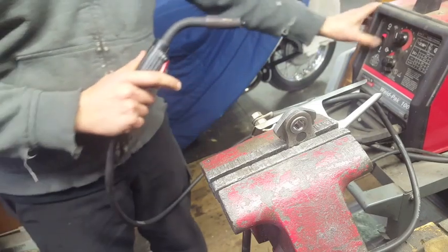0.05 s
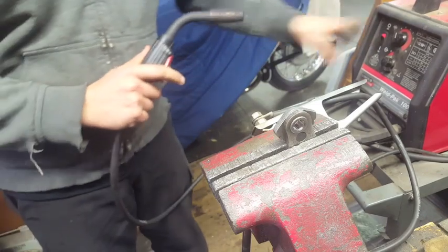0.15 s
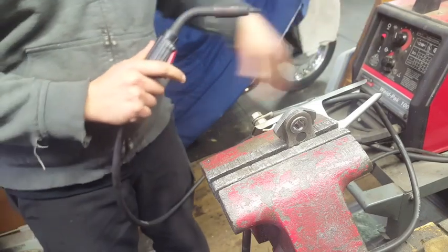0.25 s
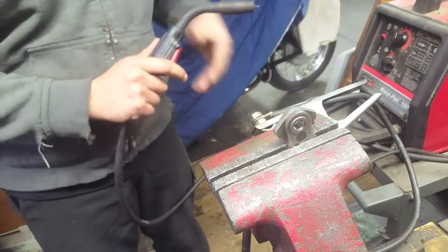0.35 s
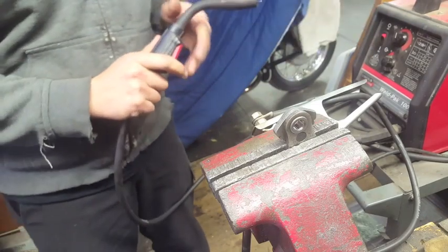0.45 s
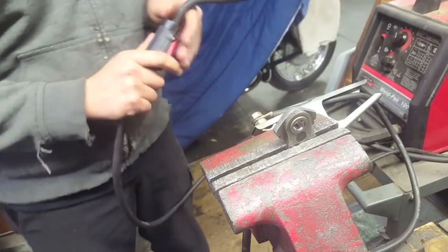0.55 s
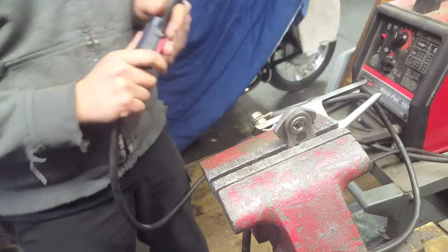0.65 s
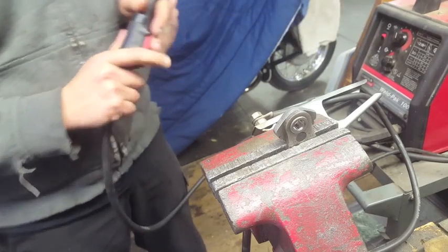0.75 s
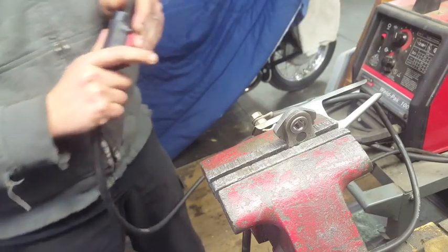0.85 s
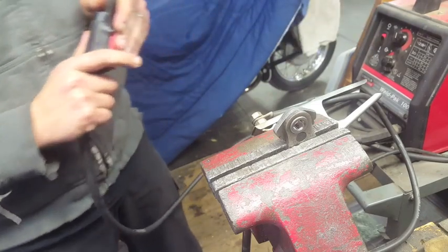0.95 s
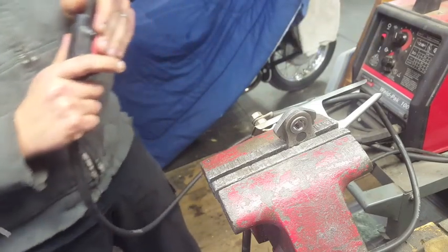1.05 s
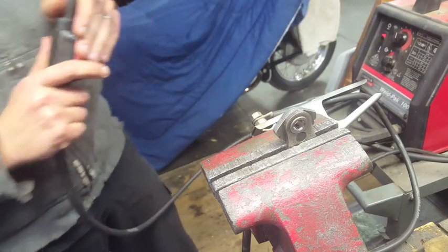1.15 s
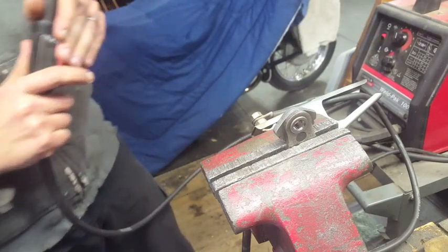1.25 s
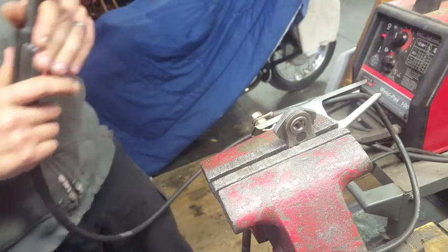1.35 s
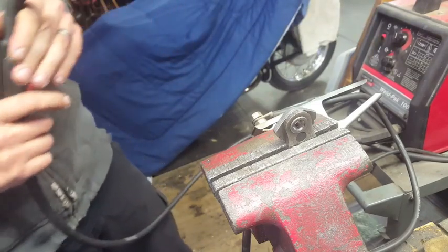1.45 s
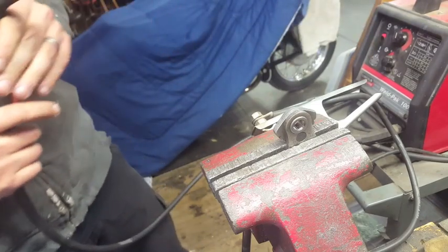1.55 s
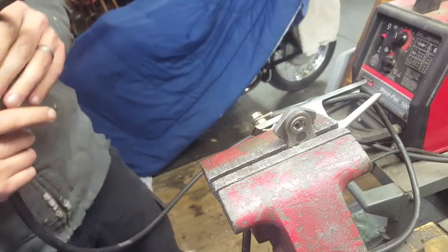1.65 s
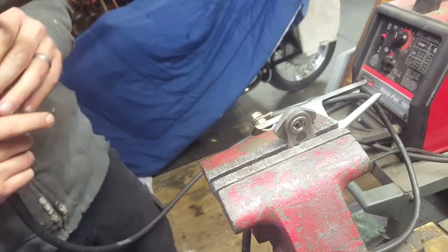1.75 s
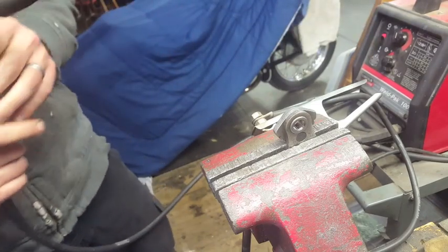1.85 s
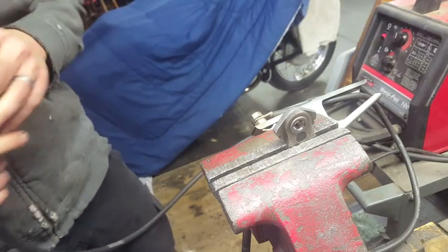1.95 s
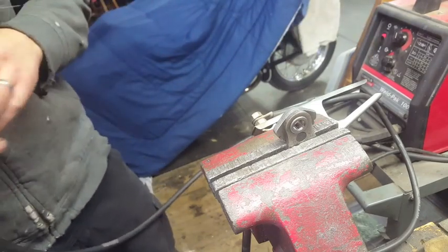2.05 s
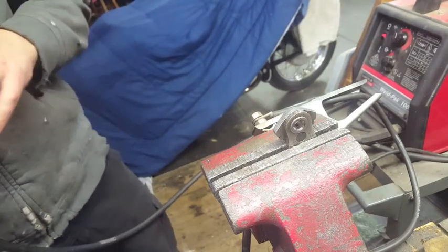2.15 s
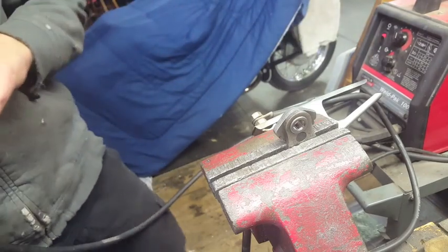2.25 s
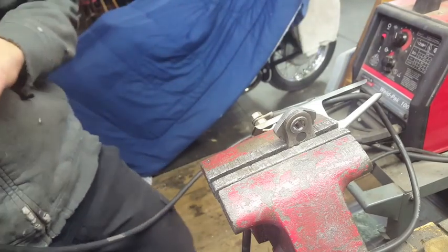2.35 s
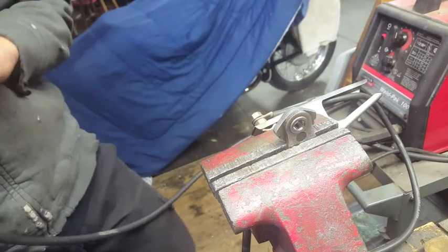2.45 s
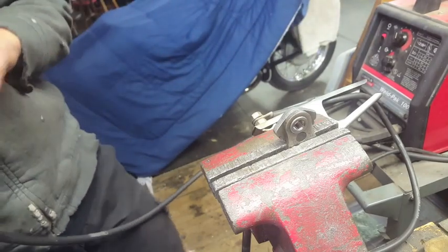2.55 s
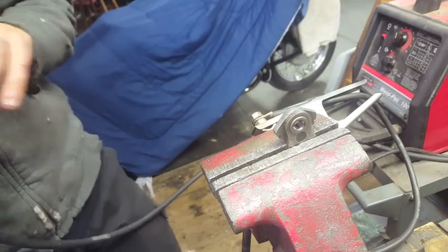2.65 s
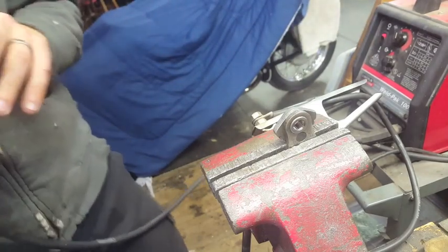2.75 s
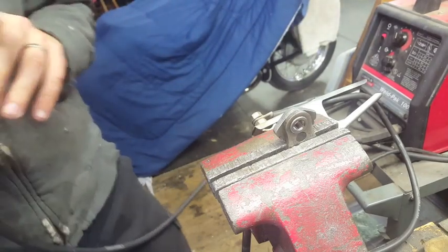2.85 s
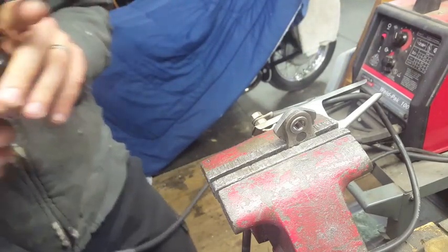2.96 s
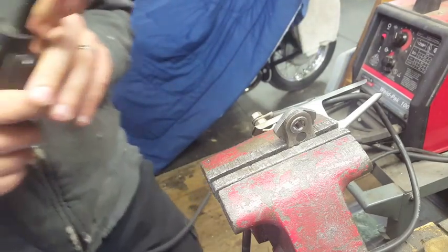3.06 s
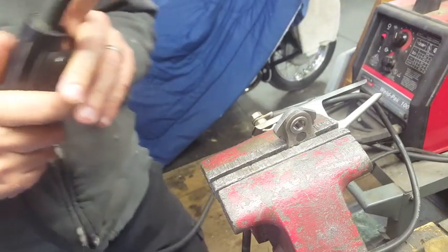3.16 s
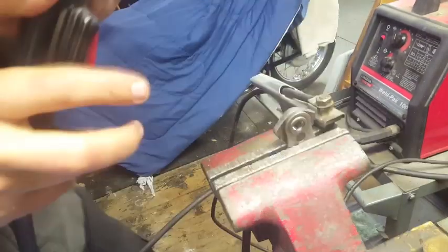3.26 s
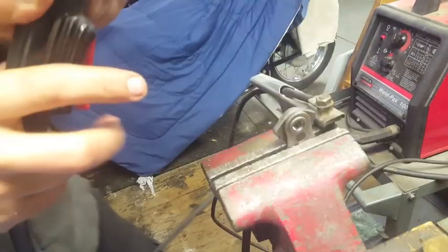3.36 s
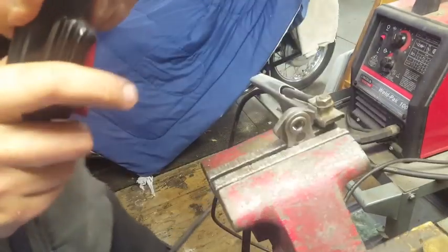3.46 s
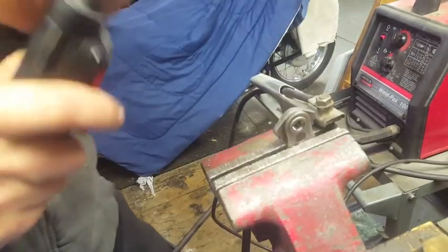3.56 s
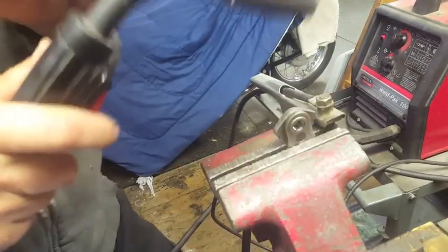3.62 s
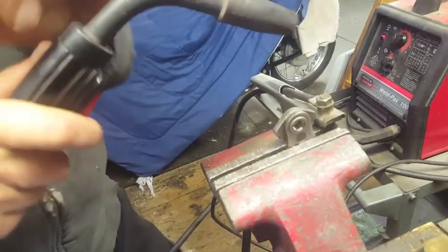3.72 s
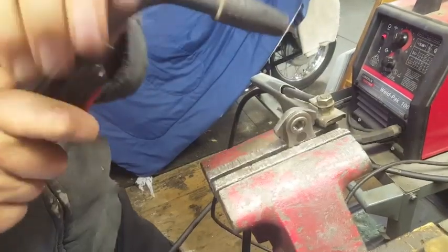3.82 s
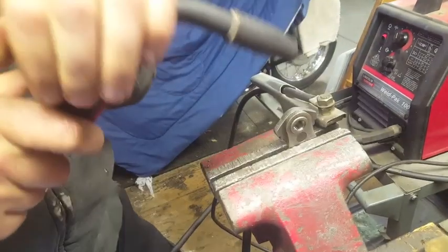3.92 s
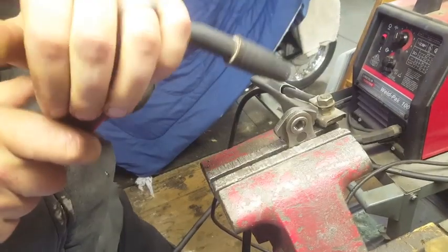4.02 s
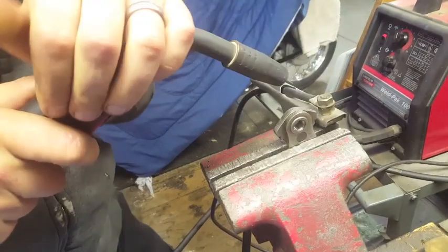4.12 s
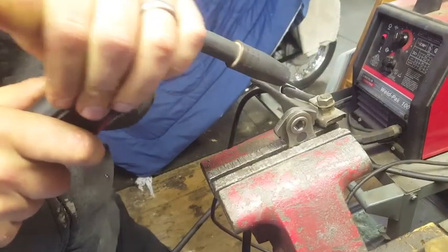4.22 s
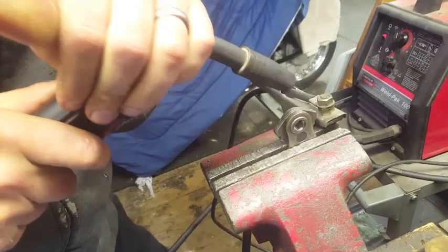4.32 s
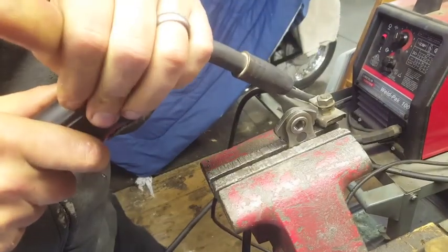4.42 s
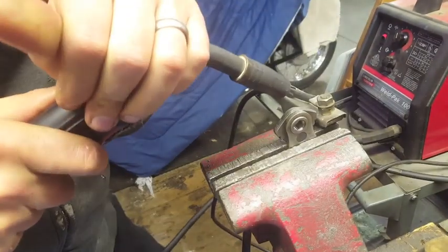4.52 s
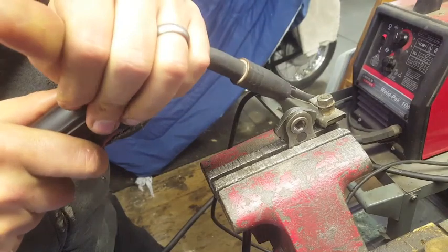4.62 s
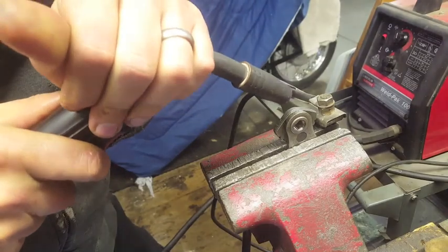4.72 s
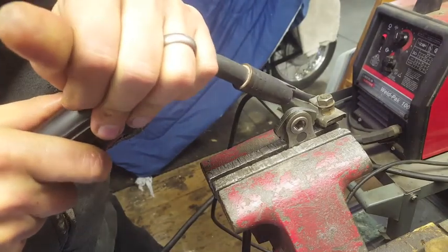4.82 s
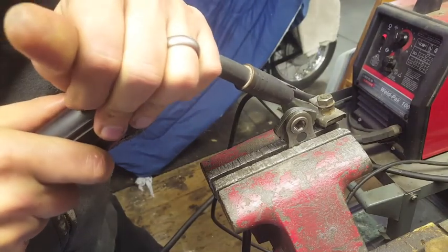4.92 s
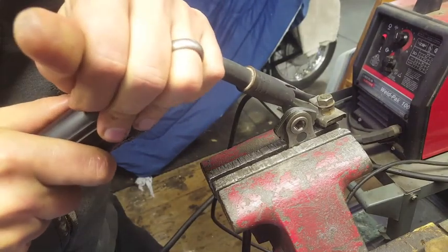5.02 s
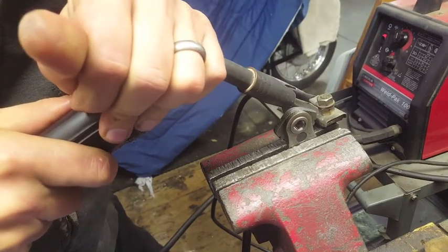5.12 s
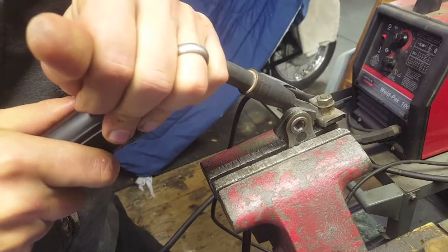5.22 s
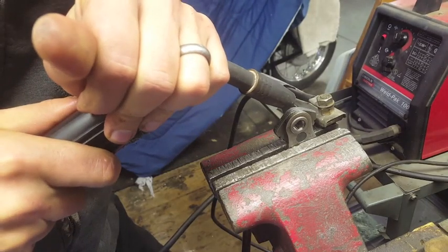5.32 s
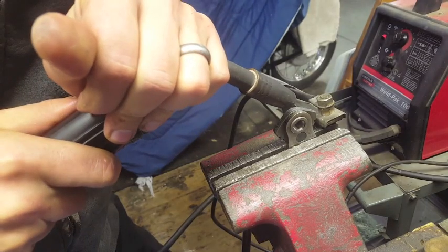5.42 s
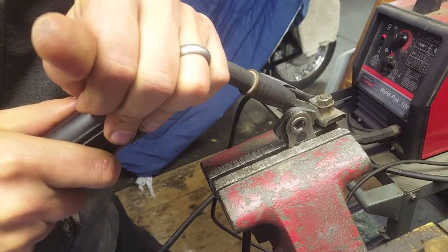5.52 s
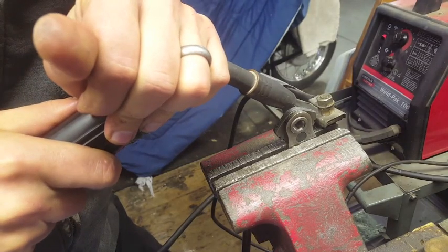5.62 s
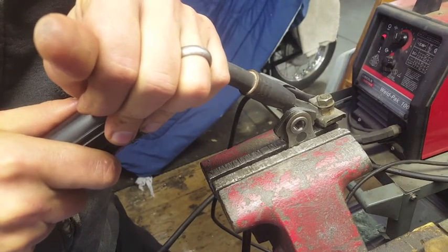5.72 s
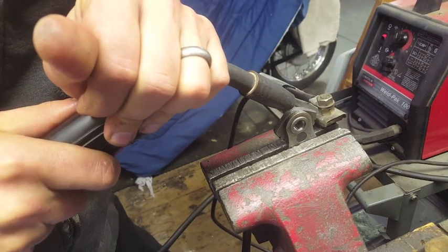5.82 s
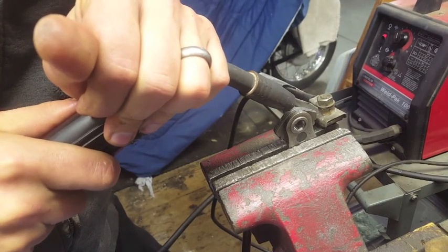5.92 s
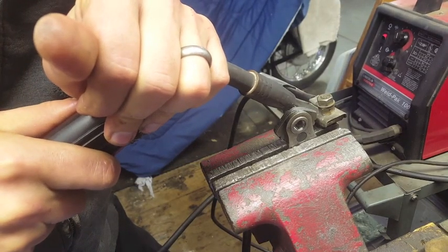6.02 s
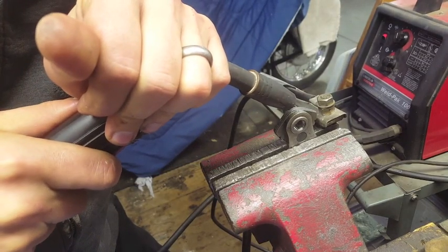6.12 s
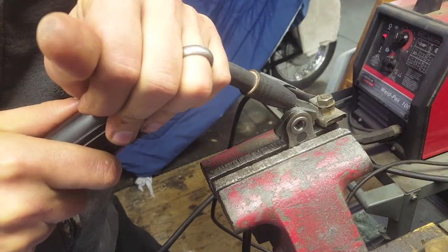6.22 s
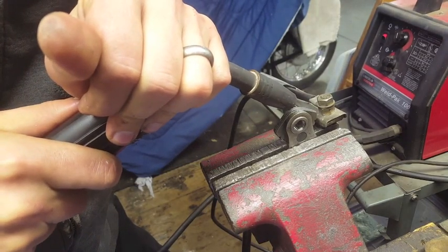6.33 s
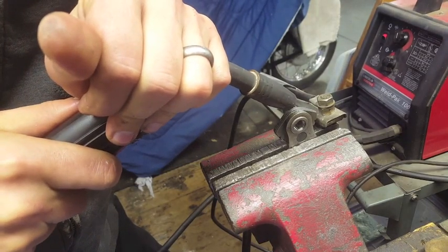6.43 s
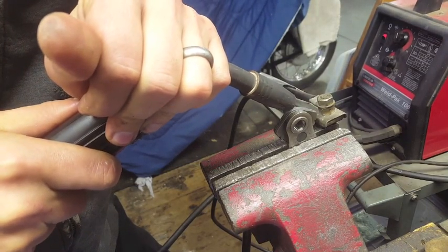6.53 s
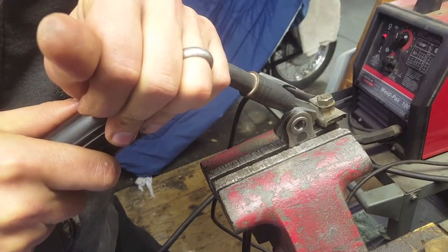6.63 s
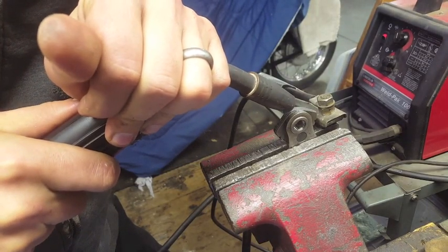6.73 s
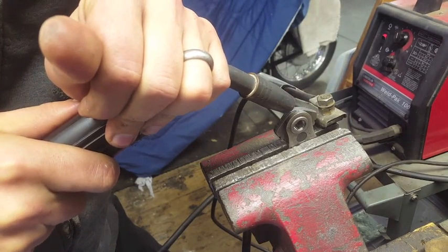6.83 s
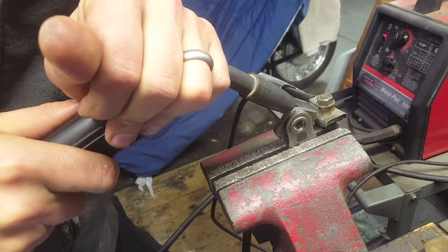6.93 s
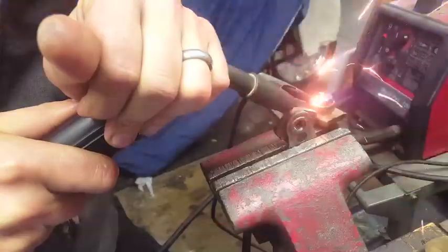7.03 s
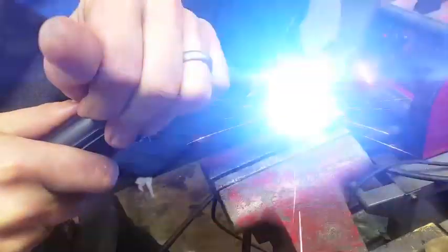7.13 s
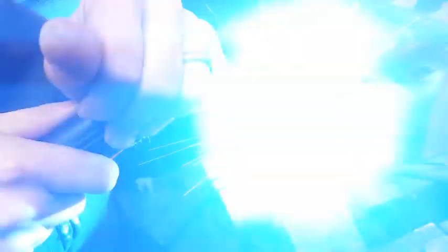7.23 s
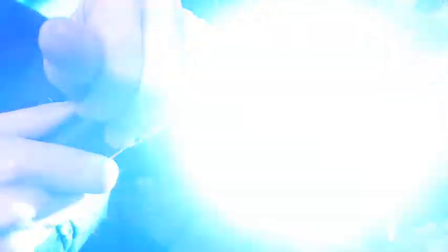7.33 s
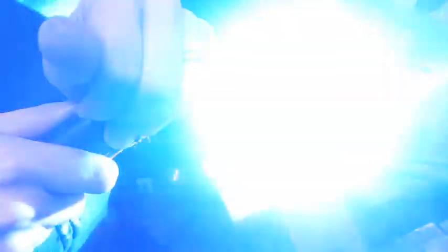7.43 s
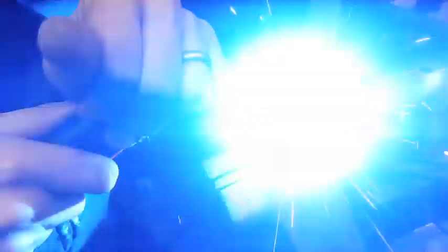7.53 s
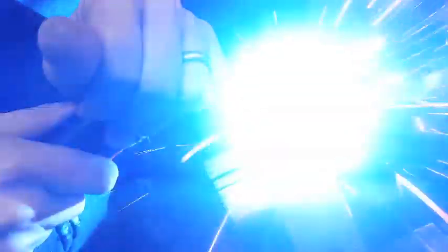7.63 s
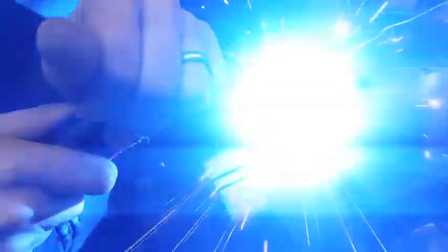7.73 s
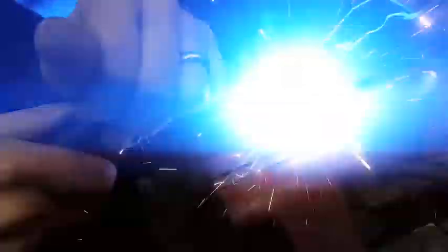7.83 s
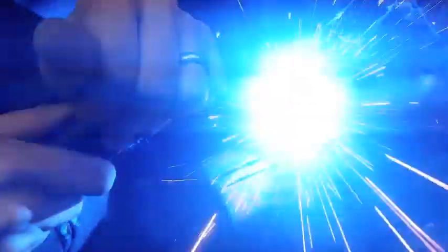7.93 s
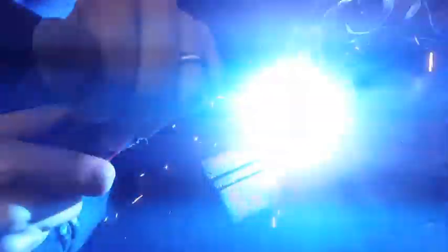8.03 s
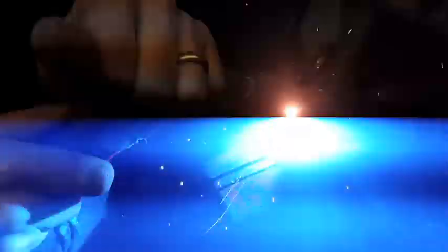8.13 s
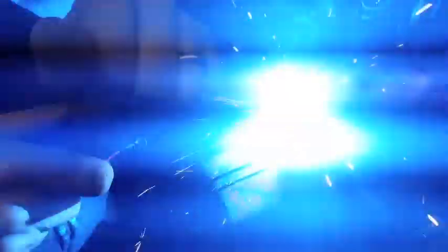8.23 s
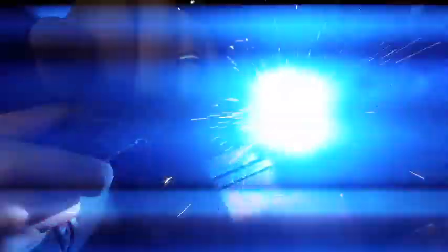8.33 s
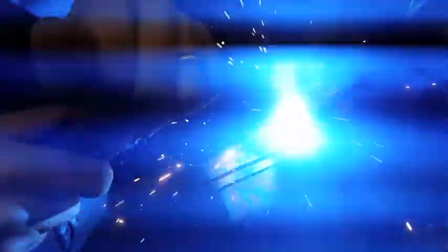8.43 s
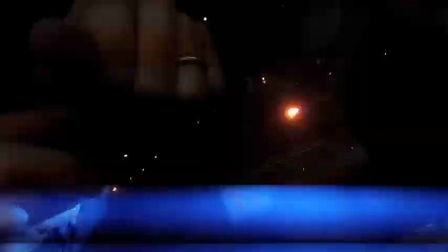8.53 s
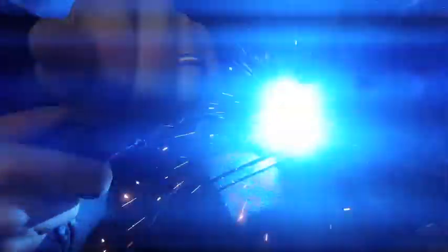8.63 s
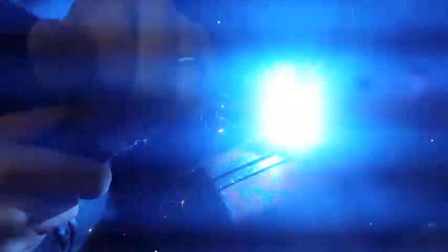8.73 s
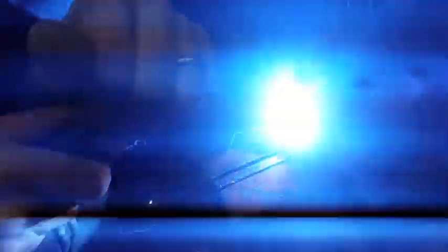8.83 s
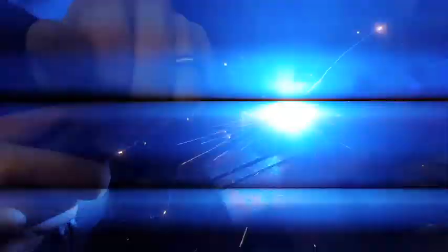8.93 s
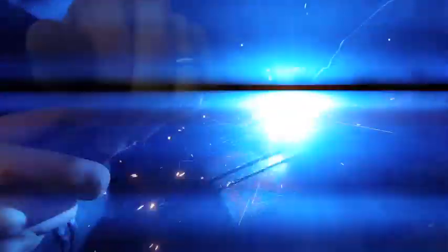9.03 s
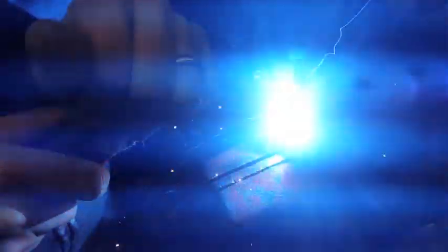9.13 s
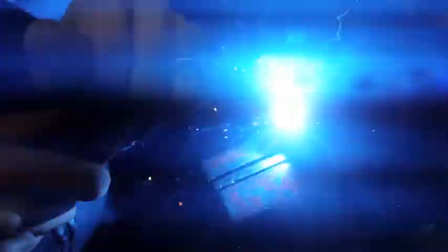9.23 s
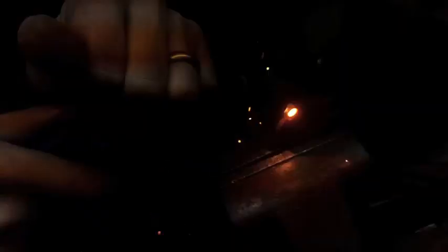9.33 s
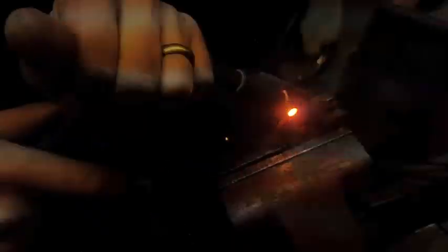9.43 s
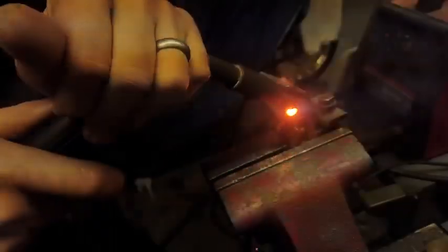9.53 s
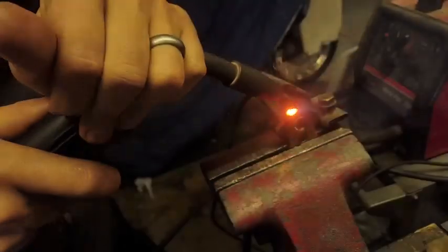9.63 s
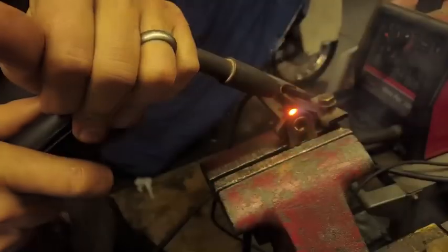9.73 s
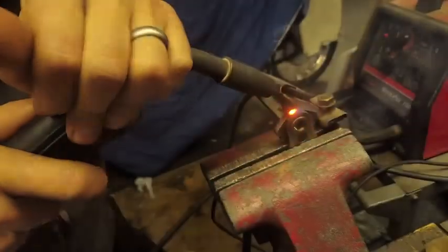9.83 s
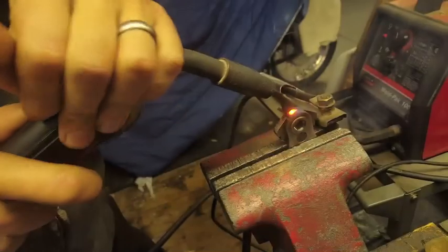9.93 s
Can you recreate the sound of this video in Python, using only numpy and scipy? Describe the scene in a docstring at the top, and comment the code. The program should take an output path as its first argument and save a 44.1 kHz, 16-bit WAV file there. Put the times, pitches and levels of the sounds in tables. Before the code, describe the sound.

A small workshop, microphone close. The tail of a switch snap, then a welder's cooling fan runs up to a steady airy hum. A short spit of gas and soft bumps as the torch is handled. After seconds of hum, gas hisses and a weld bursts out in loud, uneven cracks, thumps and fizzing spatter, then stops, leaving the fan.

```python
"""A wire-feed welder stutters on a steel part, close to the microphone, in a small workshop: each short circuit
bursts with a crack, a thump and a fizz of spatter (shaped noise and a damped swing), over the noise of the arc.
Before that the welder is switched on: its fan runs up to a hum (blade tones through the resonances of the case),
the gas valve spits in one short spurt of jet noise, and the torch is handled. Gas flows again for the weld.
Bench and walls answer the torch, the still room lies behind, and overloads turn the microphone's gain down."""
import sys
import numpy as np
from scipy import signal
from scipy.fft import rfft, irfft
from scipy.io import wavfile
from scipy.ndimage import uniform_filter1d

SR = 44100
rng = np.random.default_rng(int(sys.argv[2]) if len(sys.argv) > 2 else 0)


def persist_wave(psi):
    """Save psi, clipped to +-1, as 16-bit WAV."""
    counts = np.round(np.clip(psi, -1, 1) * 32767).astype(np.int16)
    wavfile.write(sys.argv[1], SR, np.atleast_2d(counts).T)


N = 439669
TIME = np.arange(N) / SR

# short circuits bursting at the wire tip, levels before the trims in bursts(): t/s, crack level/dB,
# spatter level/dB, thump level/dB, thump f/Hz at first, phase between the two ports/degrees, left minus right/dB
BURSTS = [(6.9902, -22, -27, -31, 500, 0, 0), (7.0496, -4, -17, -5, 120, 0, -3),
          (7.1935, -3, -17, -9, 160, 30, -2), (7.2884, -1, -6, -1, 180, 120, 0),
          (7.3166, 0, -13, -6, 220, 0, 0), (7.3276, -2, -8, -13, 570, 20, -2),
          (7.3447, -22, -24, -38, 500, 30, 2), (7.4184, -15, -26, -14, 320, 0, -1),
          (7.4755, -16, -31, -31, 500, 20, 0), (7.5428, -17, -23, -19, 120, 160, 1),
          (7.6076, -15, -18, -32, 500, 60, 1), (7.6178, -6, -13, -8, 240, 150, 1),
          (7.6333, -20, -21, -18, 140, 0, 0), (7.6522, -8, -15, -13, 570, 60, -3),
          (7.6664, -1, -10, 1, 370, 0, 0), (7.6741, -3, -12, -4, 500, 90, -1),
          (7.7009, 1, -8, -1, 270, 170, -1), (7.7398, -4, -7, -3, 580, 130, 0),
          (7.7769, -1, -8, -6, 390, 90, -3), (7.7935, -11, -19, -22, 500, 160, 0),
          (7.8359, -7, -13, -1, 320, 150, -2), (7.8813, -1, -5, -1, 410, 140, -1),
          (7.9037, -15, -15, -16, 320, 160, 0), (7.9274, -9, -18, -36, 500, 20, 0),
          (7.9485, -13, -19, -29, 500, 20, -3), (7.9617, -13, -20, -20, 500, 20, 0),
          (7.9677, -3, -4, -4, 520, 30, -5), (7.9883, -1, -4, -7, 530, 160, -2),
          (8.0082, -6, -3, -21, 500, 100, -2), (8.0271, -3, -5, -4, 400, 130, -1),
          (8.056, -1, -7, -8, 360, 150, -1), (8.2324, -15, -14, -34, 500, 70, 0),
          (8.2547, 1, -17, -2, 510, 50, 0), (8.2603, -16, -25, -25, 320, 0, 0),
          (8.2856, -3, -6, 1, 310, 50, 0), (8.2924, -1, -13, -24, 500, 20, 2),
          (8.3086, -16, -28, -42, 500, 70, 1), (8.324, 0, -10, -6, 750, 100, 1),
          (8.4181, -3, -15, -8, 440, 140, -2), (8.4411, -10, -21, -10, 460, 140, 0),
          (8.4998, -7, -19, -14, 760, 20, -4), (8.5233, -19, -27, -17, 220, 160, 0),
          (8.5548, -8, -7, -2, 500, 120, 1), (8.6405, -6, -27, 3, 510, 0, 1),
          (8.6478, -8, -9, -5, 280, 0, 1), (8.6629, -12, -19, -27, 500, 140, 0),
          (8.6951, -7, -12, -3, 740, 0, 0), (8.7199, -5, -14, -11, 670, 40, 1),
          (8.7502, -5, -17, -4, 630, 0, 2), (8.7771, 4, -3, -19, 920, 60, 0),
          (8.8644, -21, -38, -35, 500, 10, -2), (8.9444, -4, -17, -8, 470, 130, 9),
          (9.0061, -15, -21, -19, 420, 50, 0), (9.0301, -6, -7, -5, 450, 40, 2),
          (9.0411, -12, -23, -9, 900, 0, -1), (9.0701, 1, -2, 0, 810, 90, 0),
          (9.0965, 0, -9, 1, 390, 0, -4), (9.1288, -1, -10, -3, 410, 100, -3),
          (9.1615, -20, -30, -42, 500, 40, 2), (9.289, -3, -23, -5, 450, 10, -1)]
# spectrum of the crack and fizz: f/Hz, relative level/dB
CRACK_COLOUR = [(90, -7.5), (250, -5), (600, 7), (1400, -2.5), (2300, -2), (4000, -0.5), (7000, 2.5),
                (8300, 3), (9800, -9.5), (12700, 2), (15500, -4.5)]
# ringing of the part and vise: f/Hz, width/Hz, relative level/dB
STEEL_MODES = [(1280, 61, 0), (2000, 49, -3), (3210, 86, -3), (3970, 64, -4), (4690, 190, -1),
               (5470, 87, -2), (5770, 82, -5), (6320, 170, -3), (7030, 170, -1), (8140, 70, -4),
               (8450, 74, -7), (8980, 190, -10)]
# spectrum of the arc's hiss: f/Hz, relative level/dB
ARC_COLOUR = [(60, -10), (200, -9.5), (400, 5.5), (1200, 5.5), (2600, 0), (4000, -1.5), (5800, 0.5),
              (7800, -6), (9900, -24.5), (12500, -13), (15500, -19)]
# the wire sticks in the puddle and the arc goes quiet: from t/s, to t/s (an end before its start does nothing)
LULLS = [(7.592, 8), (8.203, 8.3), (8.385, 7.6), (8.612, 8.8), (8.965, 9.004), (9.19, 8.86)]
# the wire tip sizzles as it nears the puddle: t/s at the crest, relative level/dB, rise/s
SIZZLES = [(7.585, -28, .02), (8.195, -22, 0.021), (8.245, -22, 0.011), (8.447, -13.5, 0.014),
           (8.523, -12.5, 0.017), (8.603, -23.5, .015), (8.675, -15.5, 0.011), (8.938, -17, 0.025),
           (9.282, -17, 0.028)]
# the gas valve opens: open t/s, shut t/s, pressure surge level/dB, steady flow level/dB, surge decay/s,
# nozzle f/Hz at first, nozzle f/Hz at rest, nozzle level against the surge/dB
GAS_FLOWS = [(0.7035, 0.88, -26.5, -54, .11, 1980, 1690, 0.5),
             (6.981, 9.366, -28.5, -34, .15, 1830, 1658, 5.5)]
# spectrum of the jet's hiss: f/Hz, relative level/dB
GAS_COLOUR = [(80, -8), (170, 3), (450, 0.5), (1100, -2), (1500, 1), (2400, -6.5), (3400, -8), (4300, -5),
              (5100, 0.5), (6000, -1.5), (7200, -3), (8500, -5), (9900, -12), (11500, -6.5), (14000, -5),
              (16000, -24)]
# resonances of the gas nozzle: multiple of the main one, low-pass cutoff of its swirl/Hz, relative level/dB
NOZZLE_MODES = [(.34, 40, -14), (.79, 70, -10.5), (1, 115, -4), (2.95, 330, -11), (3.55, 320, -4.5)]
# the gas valve spits as it opens and shuts: t/s, relative level/dB, decay/s
SPITS = [(0.704, -12, 0.0068), (0.872, -27, 0.014), (6.9818, -11, 0.0052)]
# resonances of the welder's case, swept by the blade tones: f/Hz, width/Hz, relative level/dB
CASE_MODES = [(165, 58, 4), (244.9, 19.8, 4), (455.2, 49, -3), (550, 23, 3.5), (644, 24, 2.5), (714, 62, 2),
              (862, 33, 3.5), (921, 28, -7), (1152, 160, -10), (1333, 83, -21.5), (1740, 33, -22.5)]
# spectrum of the air through the case: f/Hz, relative level/dB
AIR_COLOUR = [(30, -24), (70, -16.5), (130, -5.5), (190, 1.5), (330, -8), (520, -6.5), (850, -7),
              (1100, -12), (2000, -19.5), (3000, -22.5), (4500, -30.5), (7200, -31.5), (9500, -53),
              (15000, -43.5)]
# resonances of the vents, sounded by the rushing air: f/Hz, width/Hz, relative level/dB
VENT_MODES = [(278, 17, -4), (381, 160, -6), (551, 36, -1), (660, 100, -14.5), (850, 38, 4.5),
              (1250, 130, -0.5), (1760, 160, -9), (2480, 390, -4), (3340, 150, -18.5)]
# soft knocks as the torch is handled, before a low cut: t/s, level/dB, f/Hz, decay/s
KNOCKS = [(0.635, -44, 64.5, .07), (0.664, -34.5, 140, 0.043), (2.846, -38, 75, 0.044),
          (2.95, -44, 70, .05), (3.099, -47, 75, .05), (3.519, -48, 55, .05), (3.8, -48, 80, .05)]
# spectrum of the still room: f/Hz, relative level/dB
ROOM_COLOUR = [(30, -29.5), (80, -10), (130, -21), (200, -9), (330, -7), (540, -8), (850, -13), (1200, -23),
               (2200, -24.5), (3200, -32), (5000, -38), (7500, -44.5), (9500, -51), (14500, -51)]
# the room's low drone: f/Hz, width/Hz, level/dB once swelled
DRONE_MODES = [(121.5, 14, -51), (131.1, 14, -49.5), (308, 60, -60.5)]

# a break with little spatter is duller: cutoff when crack and spatter are equal, dB of difference per octave
SNAP_HZ, SNAP_DB_PER_OCTAVE = 19500, 11.5
# the wire often clicks on the puddle just before a burst: chance, lead time, level against the crack
TOUCH_CHANCE, TOUCH_LEAD_S, TOUCH_DB = 0.54, 0.00028, -16
# stray droplets tick after each burst: rate per second, level against the fizz, decay
DROPLET_HZ, DROPLET_DB, DROPLET_S = 400, -2.5, 0.018
# the arc burns between these times, then dies away; the level is relative to the flares
ARC_LIT_S, ARC_OUT_S, ARC_DB, ARC_FADE_S = 7.3, 9.41, -27, 0.0088
# its flare after each burst, against the spatter, and its change of level in a lull
FLARE_DB, FLARE_S, LULL_DB = -8, 0.014, -12.5
# a low note sags late in the weld: crest and width of its swell, pitch at the crest, fall, level
SAG_S, SAG_WIDTH_S, SAG_HZ, SAG_OCTAVES_PER_S, SAG_DB = 9.18, 0.047, 322, 2.2, -28
# the flow starts fast and the hose empties after shutting
GAS_RISE_S, GAS_EMPTY_S = 0.003, 0.032
# the nozzle's ring builds up; its level against the steady flow
NOZZLE_BUILD_S, NOZZLE_STEADY_DB = 0.03, -2.5
# cooling fan: blade rate at full speed, switch-on, run-up, loudness per tenfold speed
FAN_HZ, FAN_ON_S, RUN_UP_S, FAN_DB_PER_DECADE = 241.06, .19, .75, 24
# the blade rate is a little lower at first and steps up by this much around this time
SLOW_HZ, STEP_S, STEP_LENGTH_S = 4.5, 3.2, .25
# the whole sound dips briefly: time, half length, gain left at the bottom
DIP_S, DIP_HALF_S, DIP_FLOOR = 3.341, 0.11, .017
TOP_HZ = 15900  # top cut of the microphone chain, and highest cutoff of a snap


def bursts(crack_db=0.9, fizz_db=6.0, thump_db=1.0):
    """The wire neck boils, then bursts: a crack, a puff of hot gas that swings back, and a fizz of droplets."""
    sharp, puffs = np.zeros((2, N)), np.zeros((2, N))
    lead = SR // 100
    t = TIME[:SR // 16] - TIME[lead]  # zero at the burst
    for s, crack, spatter, thump, hz, apart, side in BURSTS:
        start_s = s - TIME[lead]
        # the burst leaps about the puddle
        lag, sign = rng.integers(-1, 2), rng.choice([-1, 1])
        snap = burst_snap(t, lead, sign, spatter - crack)
        fizz = burst_fizz(t)
        mixed = db_to_gain(crack + crack_db) * snap + db_to_gain(spatter + fizz_db) * fizz
        balance = db_to_gain(np.array([[side], [-side]]) / 2)
        add(sharp, start_s, balance * delay_left(voiced(mixed), count=lag))
        puff = sign * burst_puff(t, hz, apart)
        add(puffs, start_s, db_to_gain(thump + thump_db) * delay_left(puff, count=lag))
    puffs = signal.lfilter(*signal.butter(2, 2200, fs=SR), puffs)
    puffs = signal.lfilter(*signal.butter(2, 68, "high", fs=SR), puffs)
    return steel(colour(sharp, CRACK_COLOUR)) + puffs


def burst_snap(t, lead, sign, spatter_over_crack_db, decay_s=0.00013, shock_share=0.17):
    """The crack: a clean shock front, then a ragged snap, at times with a click of the wire ahead of it."""
    ragged = noise(len(t), 0.13) * (t > 0) * np.exp(-np.maximum(t, 0) / decay_s)
    share = np.clip(shock_share, 0, 1)
    snap = np.sqrt(1 - share) * ragged / np.linalg.norm(ragged, axis=1, keepdims=True)
    snap[:, lead] -= sign * np.sqrt(share)
    top_hz = np.clip(SNAP_HZ * 2 ** (spatter_over_crack_db / SNAP_DB_PER_OCTAVE), 2000, TOP_HZ)
    snap = signal.lfilter(*signal.butter(1, top_hz, fs=SR), snap)
    # energy of 1.5 ms at rms 1
    snap *= np.sqrt(SR * .0015 / np.sum(snap ** 2, axis=1, keepdims=True))
    touches = rng.random() < TOUCH_CHANCE
    return snap + touches * db_to_gain(TOUCH_DB) * np.roll(snap, -int(TOUCH_LEAD_S * SR), axis=1)


def burst_fizz(t, decay_s=0.0043, swell_s=0.0036, swell_db=-9):
    """The spatter: grainy noise swells as the neck boils and decays after the burst, with ticks of droplets."""
    age, burst = np.maximum(t, 0), t >= 0
    steps = np.repeat(rng.standard_normal(len(t)), SR // 3000)[:len(t)]
    grain = db_to_gain(2.5 * steps)
    boil = db_to_gain(swell_db) * np.exp(-abs(t) / swell_s)
    envelope = np.where(burst, np.exp(-age / decay_s), boil)
    fizz = grain * noise(len(t), 0.24) * envelope
    droplets = (rng.random(len(t)) < DROPLET_HZ / SR) * rng.laplace(size=len(t))
    return fizz + db_to_gain(DROPLET_DB) * droplets * burst * np.exp(-age / DROPLET_S)


def burst_puff(t, hz, apart, damping=0.72, slowing_s=0.018):
    """The thump: hot gas swings back, damped; each port meets the swirling puff at its own angle."""
    age = np.maximum(t, 0)
    turn = 2 * np.pi * hz * age / (1 + age / slowing_s)  # it slows as it spreads
    angle = np.radians(apart) * np.array([[1], [-1]]) / 2
    puff = (t >= 0) * np.exp(-damping * turn) * np.cos(turn + angle)
    # energy of 5 ms at rms 1
    return puff * np.sqrt(SR * .005 / np.sum(puff ** 2, axis=1, keepdims=True))


def voiced(x, low_hz=900, high_hz=7000, peak_db=-2, width=.3, echo_db=-13, near_s=.0016, far_s=.0034, count=3):
    """Each burst has its own shape and place: a few random resonances and its own path by way of the vise."""
    centres = low_hz * (high_hz / low_hz) ** rng.random(count)
    y = x + db_to_gain(peak_db) * sum(resonance(x, hz, width * hz) for hz in centres)
    y = y + db_to_gain(echo_db) * np.roll(y, int(rng.uniform(near_s, far_s) * SR), axis=1)
    return y * np.linalg.norm(x) / np.linalg.norm(y)


def steel(x, ring_db=-1.5):
    """The clamped part rings with the sound that strikes it: parallel resonances added to it."""
    ring = sum(db_to_gain(db) * resonance(x, hz, width) for hz, width, db in STEEL_MODES)
    return x + db_to_gain(ring_db) * ring


def arc(grain_db=4.0, ripple=0.24, tick_db=-1, tick_rate=300, cluster_db=7, cluster_rate=45,
        waver_db=4.5, waver_rate=40, trim_db=-4.5):
    """The arc flares after each burst, hisses, ripples with the rectified mains and throws clustered sparks."""
    kicks = np.zeros(N)
    for s, _, spatter, *_ in BURSTS:
        kicks[int(s * SR)] = db_to_gain(spatter + FLARE_DB)
    flare = signal.lfilter([1], [1, -np.exp(-1 / (FLARE_S * SR))], kicks)
    burn = db_to_gain(ARC_DB) * (TIME > ARC_LIT_S) * np.exp(-since(ARC_OUT_S) / ARC_FADE_S)
    stuck = sum(1. * (TIME > start) * (TIME < end) for start, end in LULLS)
    stuck = uniform_filter1d(stuck, size=200)  # soft edges
    mains = 1 + ripple * np.sin(2 * np.pi * 120 * TIME)
    hiss = noise(N, 0.3) * db_to_gain(grain_db * walk(400)) * mains
    rate = tick_rate * db_to_gain(cluster_db * walk(cluster_rate))
    sparks = (rng.random(N) < rate / SR) * rng.uniform(-3.0, 3.3, N)
    sparks = sparks * rng.uniform(0.24, 1, (2, N))  # each at its own place
    sputter = colour(hiss + 10 * db_to_gain(tick_db) * sparks, ARC_COLOUR)
    level_db = waver_db * walk(waver_rate) + LULL_DB * stuck + trim_db
    return sputter * np.hypot(burn, flare) * db_to_gain(level_db)


def sizzle(level_db=-2, fall_s=0.0076):
    """A thin bright hiss swells exponentially as the wire nears the puddle, and breaks off."""
    swell = 0
    for s, db, rise_s in SIZZLES:
        slope = np.where(TIME < s, (TIME - s) / rise_s, (s - TIME) / fall_s)
        swell = swell + db_to_gain(db + level_db) * np.exp(slope.clip(-30, 0))
    # this fast drift has come to rest before the sizzles: one random level for all of them
    shared_level = db_to_gain(2.5 * walk(600))
    spectrum = [(500, -7.0), (3500, -9.5), (5500, 1), (7800, 2.5), (9900, -12.5), (13000, 3.0), (16000, -5.5)]
    return colour(noise(N, 0.13) * shared_level * swell, spectrum)


def sag(rough_hz=80):
    """A short, rough low note falls in pitch: sine and cosine with randomly drifting amplitudes."""
    hz = SAG_HZ * 2 ** np.clip(SAG_OCTAVES_PER_S * (SAG_S - TIME), -1, 1)
    swell = np.exp(-((TIME - SAG_S) / SAG_WIDTH_S) ** 2)
    phase = 2 * np.pi * np.cumsum(hz) / SR
    rough = walk(rough_hz) * np.sin(phase) + walk(rough_hz) * np.cos(phase)
    return swell * db_to_gain(SAG_DB) * rough


def gas():
    """The jet hisses and sounds the nozzle's resonances, which sink as the pressure falls."""
    flow, ring, hz = 0, 0, np.full(N, GAS_FLOWS[0][-2], float)
    for opens, shuts, surge_db, steady_db, surge_s, start_hz, rest_hz, ring_db in GAS_FLOWS:
        valve = (1 - np.exp(-since(opens) / GAS_RISE_S)) * np.exp(-since(shuts) / GAS_EMPTY_S)
        pressure = np.exp(-since(opens) / surge_s)
        surge = valve * pressure * db_to_gain(surge_db)
        steady = valve * db_to_gain(steady_db)
        flow = flow + surge + steady
        drive = surge * db_to_gain(ring_db) + steady * db_to_gain(NOZZLE_STEADY_DB)
        ring = ring + valve * drive * (1 - np.exp(-since(opens) / NOZZLE_BUILD_S))
        sinking_hz = rest_hz + (start_hz - rest_hz) * pressure * (2 - pressure)
        hz = np.where(TIME > opens, sinking_hz, hz)
    phase = 2 * np.pi * np.cumsum(hz) / SR
    nozzle = 0
    for ratio, width, mode_db in NOZZLE_MODES:
        # slow complex noise carried up to the gliding resonance
        swirl = signal.lfilter(*signal.butter(2, width, fs=SR), noise(N, 0.18) + 1j * noise(N, 1.0))
        nozzle = nozzle + db_to_gain(mode_db) * unit((swirl * np.exp(1j * ratio * phase)).real)
    jet = flow * colour(noise(N, 0.29), GAS_COLOUR)
    return (jet + ring * nozzle) * db_to_gain(1.0 * walk(150))


def spits(rise_s=0.0018):
    """Pressure stored behind the valve leaves in one bright puff of noise."""
    out, t = np.zeros((2, N)), TIME[:SR // 10]
    for s, db, decay_s in SPITS:
        envelope = (1 - np.exp(-t / rise_s)) * np.exp(-t / decay_s)
        add(out, s, db_to_gain(db) * noise(len(t), 0.1) * envelope)
    spectrum = [(150, -20), (1200, -6.5), (3500, 7.5), (7000, 3.5), (9800, -13.0), (12500, 3.0), (16000, -4.5)]
    return colour(out, spectrum)


def room(x, wet_db=-11, t60_s=0.19, gap_s=0.0033, low_hz=170):
    """Bench and walls answer with a short diffuse tail; the low puffs hardly carry that far."""
    t = TIME[:SR // 2]
    tail = noise(len(t), 0.044) * np.exp(-np.log(1000) * t / t60_s) * (t > gap_s)
    tail = signal.lfilter(*signal.butter(2, low_hz, "high", fs=SR), tail)
    tail /= np.linalg.norm(tail, axis=1, keepdims=True)
    return x + db_to_gain(wet_db) * signal.oaconvolve(x, tail, axes=1)[:, :N]


def fan(tone_db=-45.5, air_db=-41.5, wobble=0.0011, wander=.003, flutter_db=1.0, unsteady_db=14,
        dull_db=15, open_db=-13, count=7):
    """The motor runs up against air drag; blade tones rise through the case's resonances, over rushing air."""
    top_hz = FAN_HZ - SLOW_HZ * (1 - np.tanh((TIME - STEP_S) / STEP_LENGTH_S)) / 2
    hz = top_hz * np.tanh(since(FAN_ON_S) / RUN_UP_S) * (1 + wander * walk(1.5))
    phase = 2 * np.pi * np.cumsum(hz * (1 + wobble * walk(9))) / SR
    tones, speed = 0, hz / FAN_HZ
    for k in range(1, count + 1):
        # a share escapes straight through the vents
        power = db_to_gain(open_db) ** 2 / k
        for mode_hz, width, db in CASE_MODES:
            detuning = 2 * (k * hz - mode_hz) / width
            power = power + db_to_gain(db) ** 2 / (1 + detuning ** 2) ** 2
        # slow blades give a duller, more broken tone
        power = power * speed ** ((k - 1) * dull_db / 10)
        flutter = (flutter_db + unsteady_db * np.minimum(1 - speed, .3)) * walk(12)
        tone = np.sin(k * phase + rng.uniform(0, 2 * np.pi))
        tones = tones + np.sqrt(2 * power) * db_to_gain(tone_db + flutter) * tone
    air = colour(noise(N, 0.49), AIR_COLOUR)
    air = unit(air + sum(db_to_gain(db) * resonance(air, f, w) for f, w, db in VENT_MODES))
    air = air * db_to_gain(air_db + 0.48 * walk(14))
    return (tones + delay_left(air, count=11)) * speed ** (FAN_DB_PER_DECADE / 20)


def switch(level_db=-39, decay_s=0.038):
    """The last of the power switch's snap dies away in the case: decaying noise from the first moment."""
    ring = noise(N, 0.48) * np.exp(-np.minimum(TIME / decay_s, 30))
    spectrum = [(200, 5.0), (900, 3.5), (2000, -7), (4500, -11.5), (7000, -8), (9800, -27), (13500, -17),
                (16000, -26)]
    return db_to_gain(level_db) * colour(ring, spectrum)


def knocks(low_hz=45):
    """Dull bumps as the torch is taken in both hands: decaying noise through a broad low resonance."""
    out, t = np.zeros((2, N)), TIME[:SR // 3]
    for s, db, hz, decay_s in KNOCKS:
        thud = noise(len(t), 1.0) * np.exp(-t / decay_s)
        bump = resonance(resonance(thud, hz, hz), hz, hz)
        add(out, s, db_to_gain(db) * bump * np.sqrt(SR * decay_s / np.sum(bump ** 2)))
    return signal.lfilter(*signal.butter(2, low_hz, "high", fs=SR), out)


def workshop(room_db=-49, early_db=-6, swells_s=0.3, swelling_s=0.7):
    """Still air, and low tones that waver against each other and swell as the welder starts."""
    drone = 0
    for hz, width, db in DRONE_MODES:
        tone = resonance(resonance(rng.standard_normal(N), hz, width), hz, width)
        drone = drone + db_to_gain(db) * unit(tone)
    swell = db_to_gain(early_db * (1 - np.tanh((TIME - swells_s) / swelling_s)) / 2)
    return db_to_gain(room_db) * colour(noise(N, 0.65), ROOM_COLOUR) + swell * drone


def db_to_gain(db):
    """Decibels to gain."""
    return 10 ** (np.asarray(db) / 20)


def unit(x):
    """Scale to rms 1."""
    return x / np.sqrt(np.mean(x ** 2))


def since(s):
    """Seconds after a time, zero before it."""
    return np.maximum(TIME - s, 0)


def add(out, s, sound):
    """Mix a stereo sound in at a time."""
    i = int(s * SR)
    out[:, i:i + sound.shape[1]] += sound[:, :N - i]


def noise(size, alike):
    """Stereo white noise whose channels share a part of their power."""
    shared = np.clip(alike, 0, 1)
    return np.sqrt(shared) * rng.standard_normal(size) + np.sqrt(1 - shared) * rng.standard_normal((2, size))


def walk(rate):
    """Random drift with a spread near 1, by lines between knots at this rate; it rests after 4096 knots."""
    knots = rng.standard_normal(4096)
    return 1.2 * np.interp(TIME * rate, np.arange(len(knots)), knots)


def colour(x, points, size=4096):
    """Causal minimum-phase filter with the given spectrum; white noise keeps its power."""
    hz, db = np.transpose(points)
    f = np.maximum(np.fft.rfftfreq(size, 1 / SR), 1)
    gain = db_to_gain(np.interp(np.log(f), np.log(hz), db)) * np.minimum(f / hz[0], 1) ** 2
    # folding the cepstrum makes the response causal
    cepstrum = irfft(np.log(gain))
    cepstrum[1:size // 2] *= 2
    cepstrum[size // 2 + 1:] = 0
    response = irfft(np.exp(rfft(cepstrum)))
    return signal.oaconvolve(x, response[None] / np.linalg.norm(response), axes=1)[:, :N]


def resonance(x, hz, width):
    """Two-pole band-pass, gain 1 at the centre."""
    return signal.lfilter(*signal.iirpeak(hz, hz / width, fs=SR), x)


def delay_left(x, count):
    """A source on the right reaches the left port some samples late; a negative count puts it on the left."""
    return np.array([np.roll(x[0], count), x[1]])


def scene():
    """The torch sounds in the room, over the fan and the still air; the whole level dips briefly once."""
    background = fan() + workshop() + knocks() + switch()
    torch = room(steel(arc() + sizzle()) + sag() + gas() + spits() + bursts())
    dip = np.clip(abs(TIME - DIP_S) / DIP_HALF_S, DIP_FLOOR, 1)
    return (torch + background) * dip


def gain_control(x, threshold=0.7, depth_db=15.5, attack_s=0.11, hold_s=0.28, recover_db_per_s=28):
    """An overload turns the microphone's gain down; it is held there, then creeps back."""
    over = np.abs(x).max(axis=0) > threshold
    waited_s = TIME - np.maximum.accumulate(np.where(over, TIME, -np.inf))
    cut_db = np.clip(depth_db - recover_db_per_s * (waited_s - hold_s), 0, depth_db)
    step = 1 / (attack_s * SR)
    smooth_cut_db = signal.lfilter([step], [1, step - 1], cut_db)
    return x * db_to_gain(-smooth_cut_db)


def record(dry):
    """Gain control, peaks rounded at full scale and a steep top cut."""
    rounded = np.tanh(gain_control(dry))
    top_cut = signal.ellip(8, .2, 85, TOP_HZ, fs=SR, output="sos")
    return signal.sosfilt(top_cut, rounded)


dry = scene()
out = record(dry)
persist_wave(out)
```